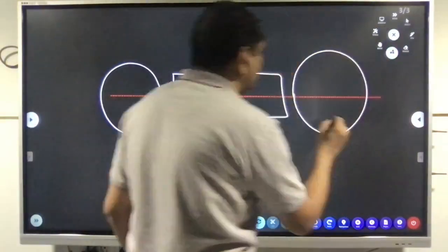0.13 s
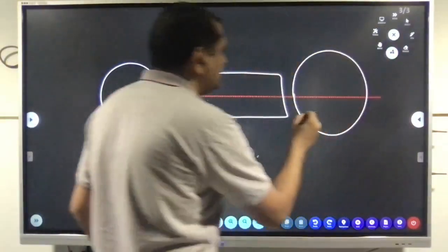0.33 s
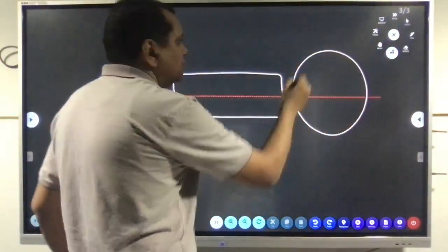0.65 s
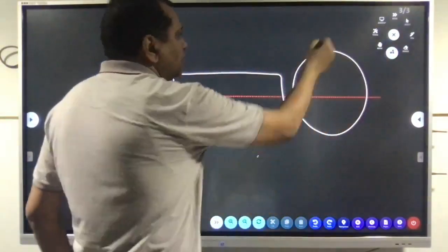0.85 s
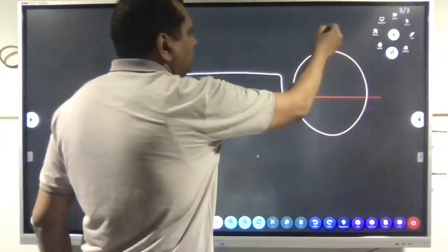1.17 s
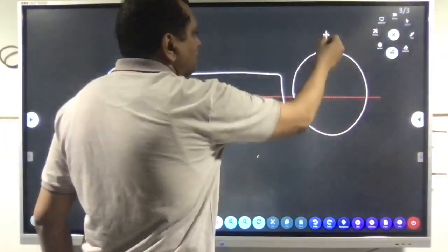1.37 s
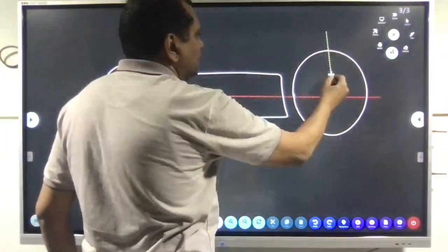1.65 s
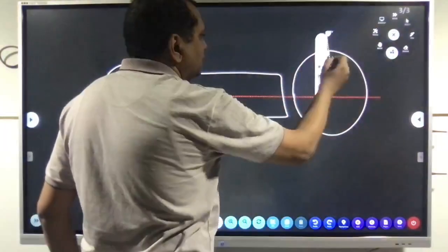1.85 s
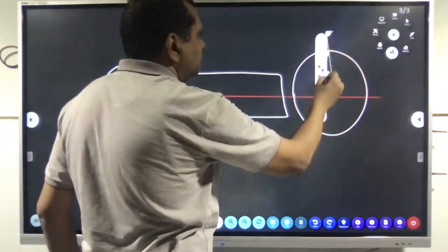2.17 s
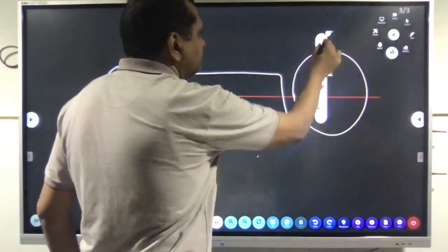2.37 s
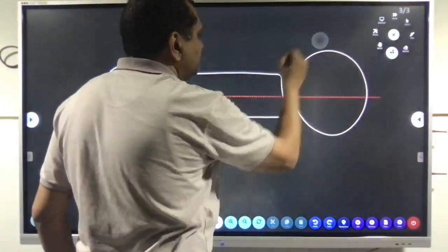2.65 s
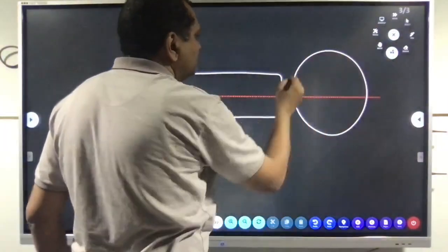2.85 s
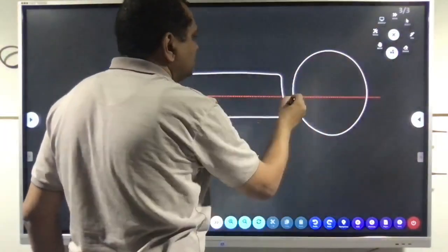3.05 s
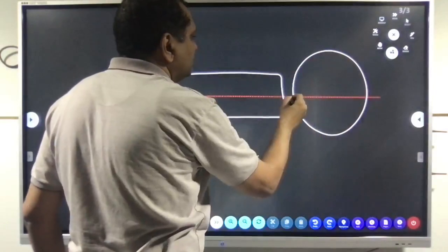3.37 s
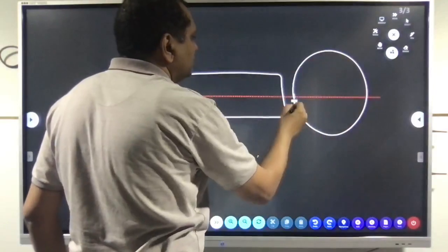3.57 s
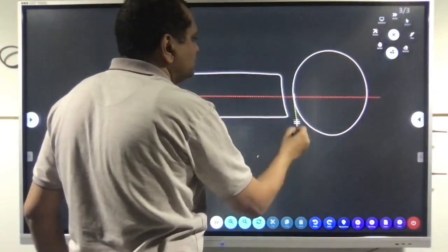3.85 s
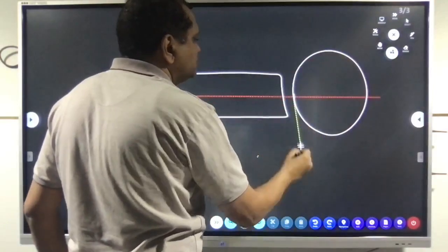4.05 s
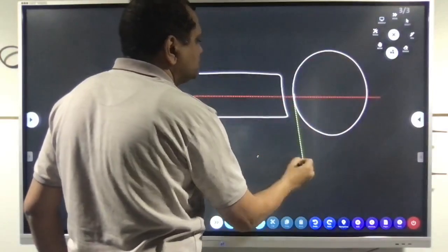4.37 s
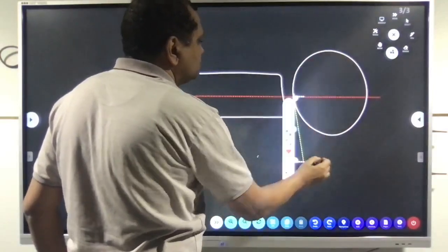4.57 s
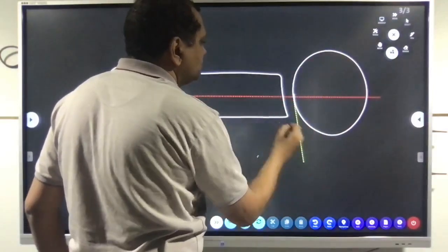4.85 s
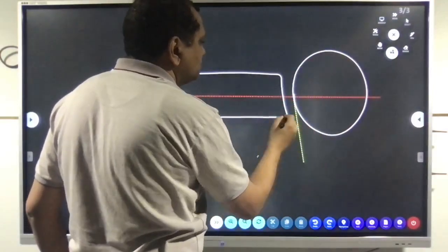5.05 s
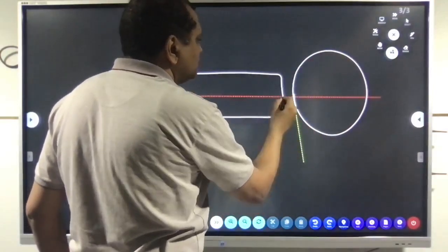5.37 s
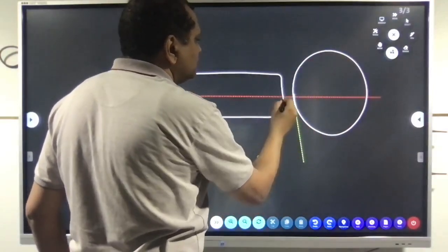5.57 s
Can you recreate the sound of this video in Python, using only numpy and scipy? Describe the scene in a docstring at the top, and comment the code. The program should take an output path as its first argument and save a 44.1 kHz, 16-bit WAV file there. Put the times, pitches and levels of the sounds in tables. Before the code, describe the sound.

A hard stylus taps a big glass display at uneven strengths, making five hollow knocks with a slight ring, the second and fourth loudest. Before them comes a short shoe scrape and squeak, and between them the tip glides with a very soft hiss. The microphone is fairly close in a small, slightly echoing room, with a steady faint high whine, a low rush of air and a far clock ticking.

```python
"""Stylus on a glass touchscreen

In a quiet, bare room a stylus knocks on a large screen: each impact thumps the panel, excites its
modes and clicks the hard tip. Gliding, the tip hisses and sings by stick-slip friction. Shoes knock,
scuff and squeak as the writer steps aside. The display's power supply whines near 10 kHz, and a far
clock ticks once a second."""
import sys
import numpy as np
from scipy import signal
from scipy.fft import rfft, irfft
from scipy.io import wavfile

SR = 44100
rng = np.random.default_rng(int(sys.argv[2]) if len(sys.argv) > 2 else 0)


def transcribe(u):
    """Save the signal u as a 16-bit wav file named by the first command-line argument.

    u: samples, shape (n,) or (channels, n), limited to [-1, 1]; the rate is SR.
    q: integer samples, one column per channel.
    """
    v = np.clip(np.atleast_2d(u).T, -1, 1)
    q = np.round(v * 32767).astype(np.int16)
    wavfile.write(sys.argv[1], SR, q)


N = 252252


# Spectra of the panel's thump and the tip's click. Each row: frequency in Hz, relative level in dB.
THUMP_SPECTRUM = [(30, -4.5), (100, 3.5), (145, 2.5), (300, 4.5), (500, 7), (800, 1), (1100, 0.5),
                  (1350, -12), (1600, -4.5), (2000, -7.5), (2700, -24.5), (4000, -18), (9000, -14)]
TIP_SPECTRUM = [(500, -31), (2000, -6.5), (3000, -12.5), (4100, 6.5), (5000, 0.5), (6200, 7), (7300, -4),
                (8500, -13.5), (10500, 2), (13000, -14), (16000, -7.5)]
# Each row: mode frequency in Hz, relative level in dB, time to decay by 60 dB in seconds.
PANEL_MODES = [(138.5, 3.5, 0.75), (160.6, 1.5, .55), (189.7, 1.5, 0.72), (247.2, 5.5, 0.54),
               (293, -21, 0.9), (370, 1, 0.24), (433.5, 2.5, 0.49), (484, 6.5, 0.37), (538, 0.5, 0.3),
               (590.6, 11.5, 0.25), (625, 4, 0.33), (730, -19, 1.4), (792, -19, 4.9), (815, 2.5, 0.41),
               (944, -29, .28), (1010, -32, .38), (1100, -10, 0.97), (1130, -9, 1.1), (1217, 1, 0.32),
               (1557, -1, 0.22), (1557, -23, 0.28), (1710, -5, 0.25)]
# Each row: start in seconds, knock gain in dB, click gain in dB, low-pass corner in Hz, place on the
# panel from 0 to 1, notch frequency in Hz, crest frequency in Hz, lift of the crest in dB.
STYLUS_TAPS = [(1.3233, -10.5, -25, 1300, 0.29, 780, 550, 1), (2.4939, -3, -11, 2150, .1, 1150, 690, 1.5),
               (3.3388, -17, -38.5, 1090, 0.23, 810, 124, 5),
               (4.6549, -5, -15.5, 1890, 0.59, 530, 318, 4.5),
               (5.4283, -22.5, -45.5, 1140, 0.46, 795, 567, 1)]

def stylus_taps():
    """Impact excitation: each blow pushes the glass, rings its damped modes and clicks the tip."""
    thumps, rings, clicks = np.zeros((3, N))
    t = np.arange(SR) / SR
    thump = -dispersed(click(THUMP_SPECTRUM), spread_s=0.00062)
    # the hard tip clicks, then buzzes in its barrel for a few milliseconds
    buzz = resonant_noise(13500, width_hz=2600)[:SR] * t * np.exp(-t / 0.0015)
    tip = amp(-8.5) * buzz / np.linalg.norm(buzz)
    add(tip, 0, dispersed(click(TIP_SPECTRUM), spread_s=0.0035))
    for start, knock_db, click_db, corner_hz, place, notch_hz, crest_hz, crest_db in STYLUS_TAPS:
        ring = np.zeros(SR)
        for k, (hz, db, t60) in enumerate(PANEL_MODES):
            # a mode's strength depends on where the panel is struck
            coupling = (-1) ** k * (1 + 0.5 * np.cos(np.pi * (k + 1) * place))
            ring += coupling * amp(db - 60 * t / t60) * np.sin(2 * np.pi * hz * t)
        ring *= 1 - np.exp(-t / 0.0098)
        for mix, sound in ((thumps, thump), (rings, ring)):
            sound = lowpass(sound, corner_hz)  # a softer touch lasts longer and is duller
            sound = peak_filter(sound, notch_hz, db=-8.5, q=7.1)
            sound = peak_filter(sound, crest_hz, crest_db, q=4.1)
            add(mix, start, amp(knock_db) * sound)
        add(clicks, start, amp(click_db) * tip)
    thumps = room(thumps, direct_db=7, tail_db=7.5, build_s=0.003, echo_db=0)
    clicks = room(clicks, direct_db=2, tail_db=5, build_s=0.00081, echo_db=6)
    return thumps + amp(-34) * rings + clicks


def dispersed(x, spread_s):
    """Dispersion: high bending waves outrun low ones in glass, so a click spreads in time."""
    hz = np.fft.rfftfreq(2 * len(x), 1 / SR)
    group_delay = spread_s * (np.sqrt(1000 / (hz + 100)) - np.sqrt(2000 / SR))
    phase = 2 * np.pi * np.cumsum(group_delay) * hz[1]
    return irfft(rfft(x, 2 * len(x)) * np.exp(-1j * phase))


# The tip rubbing on glass. Each row: frequency in Hz, relative level in dB.
RUB_SPECTRUM = [(500, -42), (2800, -30), (4000, 0), (4700, -2), (5600, -8.5), (6400, -1.5), (8000, -4.5),
                (8900, -8), (11000, 7.5), (12000, 5), (12700, -10), (15500, -2.5)]
# Each row: start, time speeding up and time slowing down in seconds, hiss gain and ring gain in dB.
STYLUS_STROKES = [(1.325, .31, 0.06, -51.5, -60), (3.45, 0.44, 0.38, -50, -60.5),
                  (5.57, 0.33, .3, -54.5, -62.5)]

def stylus_strokes():
    """Sliding friction: the tip hisses with its speed and sings near 4 kHz as it sticks and slips."""
    t, out = np.arange(N) / SR, np.zeros(N)
    rest_hz, rise_hz, fade_db_per_s = 3995, 129, 21
    hiss = noise(RUB_SPECTRUM)
    grip = unit_rms(lowpass(rng.standard_normal(N), 24.8))  # uneven grip sways levels and pitch
    for start, speed_up, slow_down, hiss_db, ring_db in STYLUS_STROKES:
        ramp = np.interp(t - start, [0, speed_up, speed_up + slow_down], [0, 1, 0])
        speed = np.sin(np.pi / 2 * ramp)
        ring_hz = (rest_hz + rise_hz * speed) * (1 + 0.028 * grip)
        ring = resonant_noise(ring_hz, width_hz=370)
        fade_db = fade_db_per_s * np.maximum(t - start, 0)  # the tip sticks less as the stroke goes on
        out += speed * amp(hiss_db - 0.5 * grip) * hiss
        out += speed ** 0.68 * amp(ring_db + grip - fade_db) * ring
    return room(out, direct_db=-1, tail_db=-8, build_s=0.007, echo_db=-14)


# Each row: start, rise time and decay time in seconds, gain in dB, resonance in Hz.
SOLE_KNOCKS = [(0, 0.0023, 0.034, -50.5, 495), (0.145, .003, 0.019, -40.5, 520),
               (0.395, 0.019, 0.093, -47.5, 571.7), (.447, 0.0024, 0.0092, -32, 608.4)]
# A scraping sole. Each row: frequency in Hz, relative level in dB.
SCRAPE_SPECTRUM = [(200, -52), (1000, -5), (1700, -9), (2500, -16), (3500, -8), (4600, -4), (6200, -4),
                   (7400, -12), (8600, -24), (10500, -7), (12500, -15.5), (16000, -10.5)]
# Each row: start, rise time and decay time in seconds, gain in dB, low-pass corner in Hz.
SOLE_SCRAPES = [(0, 0.0016, 0.019, -55.5, 8000), (0.149, 0.016, 0.039, -49.5, 8900),
                (0.395, 0.029, .049, -51, 9000), (0.4542, 0.0012, 0.0052, -30.5, 8700),
                (.464, .021, 0.047, -48, 14000), (.59, 0.072, 0.1, -48, 15000)]
# Each row: start, rise time and decay time in seconds, pitch and bandwidth in Hz, gain in dB.
SOLE_SQUEAKS = [(.668, 0.0076, 0.02, 4480, 666, -38), (.675, 0.034, 0.016, 4804, 140, -38),
                (.82, 0.025, .02, 4820, 138, -55.5), (0.924, .012, 0.0089, 761, 50, -47),
                (1.01, 0.019, 0.021, 5390, 220, -65.5), (1.24, 0.073, 0.034, 5500, 138.5, -70)]

def shoes():
    """Impact and friction: a sole lands with a hollow knock, scrapes, and squeaks as it turns."""
    t, out = np.arange(N) / SR, np.zeros(N)
    scrape = noise(SCRAPE_SPECTRUM)

    def pressure(start, rise, decay):
        """Contact pressure builds linearly, then relaxes exponentially."""
        return np.clip((t - start) / rise, 0, 1) * np.exp(-np.maximum(t - start - rise, 0) / decay)

    for start, rise, decay, db, hz in SOLE_KNOCKS:
        out += pressure(start, rise, decay) * amp(db) * resonant_noise(hz, width_hz=280)
    for start, rise, decay, db, corner_hz in SOLE_SCRAPES:
        out += pressure(start, rise, decay) * amp(db) * lowpass(scrape, corner_hz)
    for start, rise, decay, hz, width_hz, db in SOLE_SQUEAKS:
        out += pressure(start, rise, decay) * amp(db) * resonant_noise(hz, width_hz)
    return room(out, direct_db=0, tail_db=-4, build_s=0.0085, echo_db=-15.5)


# The switching tone and its sidebands. Each row: frequency in Hz, rms level in dB.
WHINE_LINES = [(9309, -72.7), (9410, -74.2), (9508, -76.7), (9609, -69.0), (9710, -69.1), (9809, -73.3),
               (9843, -71.2), (9943, -65.7), (10043, -71.6), (10143, -65.1), (10243, -58.7), (10442, -61.2),
               (10543, -65.6), (10643, -54.7), (10743, -61.4), (10843, -65.4), (10943, -74.6)]
# The hiss around them. Each row: frequency in Hz, relative level in dB.
HISS_SPECTRUM = [(7000, -45), (8800, 0), (9400, 10), (10700, 12), (11300, -1), (12200, -21), (13000, -0.5),
                 (15500, -3), (16500, -2)]

def power_supply():
    """Modulation: mains ripple splits a switching tone into lines about 100 Hz apart."""
    t = np.arange(N) / SR
    drift_hz = unit_rms(sum(np.sin(2 * np.pi * (hz * t + rng.random())) / np.sqrt(hz)
                            for hz in np.geomspace(0.3, 4, 20)))
    sink_hz = np.linspace(2.5, -2.5, N)
    drift_cycles = np.cumsum(drift_hz + sink_hz) / SR  # all lines wander and sink together
    lines = sum(np.sqrt(2) * amp(db) * np.sin(2 * np.pi * (hz * t + drift_cycles + rng.random()))
                for hz, db in WHINE_LINES)
    return lines + amp(-67.5) * noise(HISS_SPECTRUM)


# One beat of the clock. Each row: frequency in Hz, relative level in dB.
TICK_SPECTRUM = [(200, -5), (550, 11.5), (770, 11), (1000, 12.5), (1700, 8), (2700, -3), (4000, 3),
                 (5800, -5.5), (7500, -22), (10000, -29)]

def far_clock():
    """Beyond the critical distance: ticks and softer tocks arrive mostly as reverberation."""
    first_s, period_s, tick_db, tock_db = 0.931, 1, -32.5, -36.5
    out, beat = np.zeros(N), click(TICK_SPECTRUM)
    for k, start in enumerate(np.arange(first_s, N / SR, period_s)):
        add(out, start, amp(tock_db if k % 2 else tick_db) * beat)
    return room(out, direct_db=-12, tail_db=8, build_s=0.013, echo_db=0)


# Each row: frequency in Hz, relative level in dB.
AIR_SPECTRUM = [(12, -27), (20, -2), (43, -3), (134, -6.5), (168, -12.5), (200, -9.5), (227, -20.5),
                (332, -15.5), (566, -19.5), (786, -18.5), (1480, -26.5), (1640, -31.5), (2280, -37.5),
                (2790, -44.5), (6800, -44.5), (8500, -56.5), (11000, -113)]

def room_air():
    """Ambient noise: the room's air makes a low, steady rush."""
    return amp(-51.5) * noise(AIR_SPECTRUM)


# Each row: frequency in Hz, time to decay by 60 dB in seconds.
REVERB_TIMES = [(100, 0.74), (250, 0.74), (600, 0.48), (1500, 0.56), (3000, 0.47), (5000, 0.51),
                (6500, 0.44), (9000, 0.38), (15000, 0.15)]
# Echoes from near surfaces. Each row: delay in seconds, relative amplitude.
EARLY_REFLECTIONS = [(.0043, .55), (.0064, .5), (.0132, .6), (.0186, .3), (.0208, .25)]

def room(x, direct_db, tail_db, build_s, echo_db):
    """Reverberation: direct sound, duller early reflections and a diffuse tail dying band by band."""
    hz, t, bands = signal.stft(rng.choice([-1., 1.], SR), SR, nperseg=256)
    decay = amp(-60 * t / curve_at(REVERB_TIMES, hz)[:, None])
    tail = signal.istft(bands * decay, SR, nperseg=256)[1][:SR]
    tail *= 1 - np.exp(-(np.arange(SR) / SR / build_s) ** 2)
    response = amp(tail_db) * tail / np.linalg.norm(tail)
    response[0] += amp(direct_db)
    bounce = lowpass(signal.unit_impulse(SR // 100), 6300)
    for delay, gain in EARLY_REFLECTIONS:
        add(response, delay, gain * amp(direct_db + echo_db) * bounce)
    return signal.fftconvolve(x, response)[:N]


def click(spectrum, size=4096):
    """Minimum phase: the sharpest causal pulse with the given spectrum, of energy 1."""
    log_gain = np.log(amp(curve_at(spectrum, abs(np.fft.fftfreq(size, 1 / SR)))))
    response = np.exp(np.conj(signal.hilbert(log_gain)))
    pulse = np.fft.ifft(response).real[:size // 2]
    return pulse / np.linalg.norm(pulse)


def noise(spectrum):
    """Spectral shaping: white noise takes on the given spectrum, at rms 1."""
    gain = amp(curve_at(spectrum, np.fft.rfftfreq(N, 1 / SR)))
    return unit_rms(irfft(rfft(rng.standard_normal(N)) * gain, N))


def resonant_noise(hz, width_hz):
    """Random excitation of one resonance: a band of noise whose centre may move."""
    envelope = lowpass(rng.standard_normal(N) + 1j * rng.standard_normal(N), width_hz / 2)
    carrier = np.exp(2j * np.pi * np.cumsum(hz * np.ones(N)) / SR)
    return unit_rms((envelope * carrier).real)


def peak_filter(x, hz, db, q):
    """A resonance, added or subtracted, lifts or cuts the band around hz."""
    return x + (amp(db) - 1) * signal.lfilter(*signal.iirpeak(hz, q, fs=SR), x)


def lowpass(x, hz):
    """Causal second-order low-pass."""
    return signal.sosfilt(signal.butter(2, min(hz, SR / 3), fs=SR, output="sos"), x)


def curve_at(points, hz):
    """Interpolation on a log-frequency axis."""
    point_hz, values = np.transpose(points)
    return np.interp(np.log(hz + 1), np.log(point_hz + 1), values)


def add(mix, start_s, sound):
    """Superposition of a delayed sound on the mix."""
    part = mix[max(round(start_s * SR), 0):][:len(sound)]
    part += sound[:len(part)]


def amp(db):
    """Decibels to amplitude ratio."""
    return 10 ** (np.asarray(db) / 20)


def unit_rms(x):
    """Normalisation to rms 1."""
    return x / np.sqrt(np.mean(x ** 2) + 1e-20)


def scene():
    """Superposition: the pressures of all sources add in one channel."""
    return (stylus_taps() + stylus_strokes() + shoes() + far_clock() + power_supply() + room_air())[None]


def record(dry):
    """Band limiting: a steep linear-phase low-pass removes the highest treble."""
    edge_hz = 15900
    kernel = signal.firwin(511, edge_hz, window=("kaiser", 9), fs=SR)
    return signal.oaconvolve(dry, kernel[None], "same")


dry = scene()
out = record(dry)
transcribe(out)
```